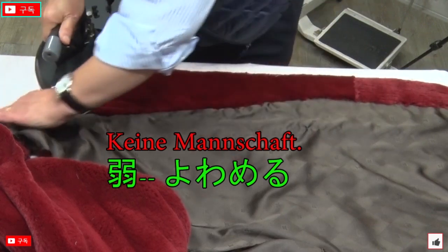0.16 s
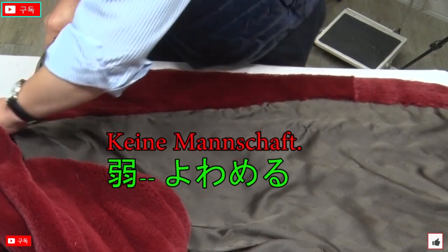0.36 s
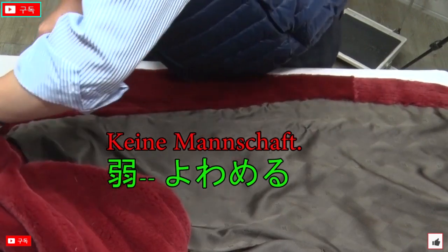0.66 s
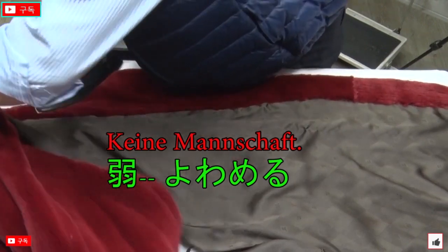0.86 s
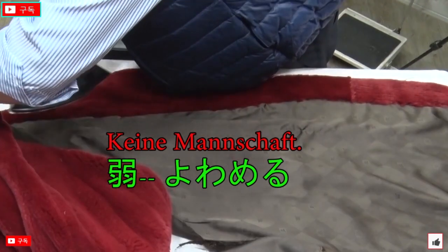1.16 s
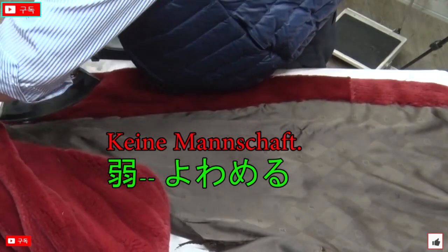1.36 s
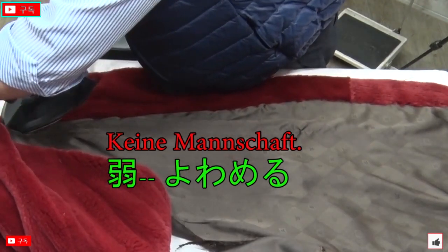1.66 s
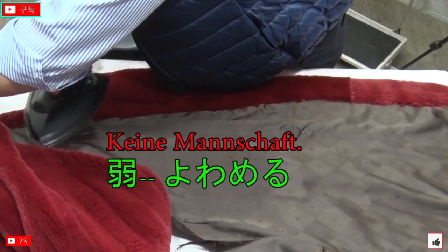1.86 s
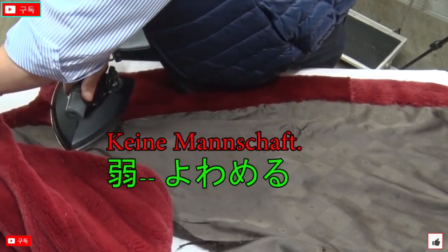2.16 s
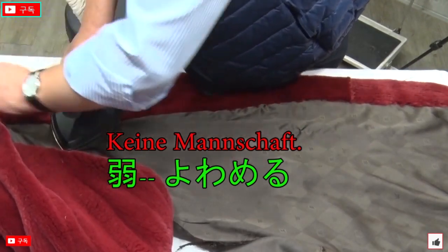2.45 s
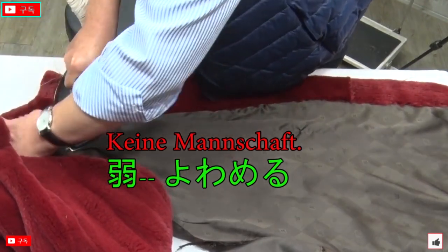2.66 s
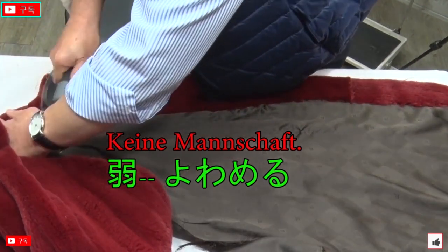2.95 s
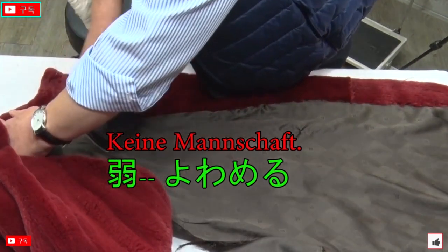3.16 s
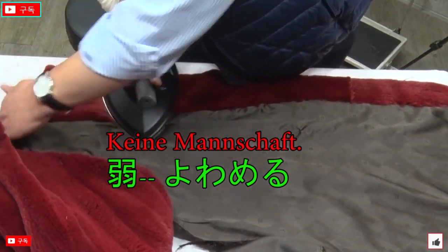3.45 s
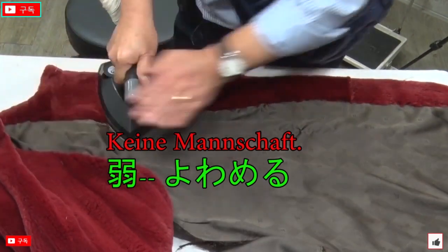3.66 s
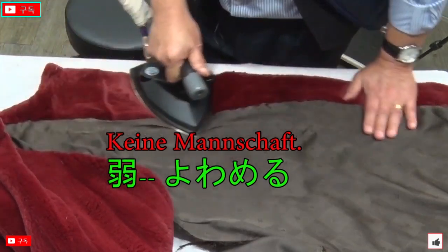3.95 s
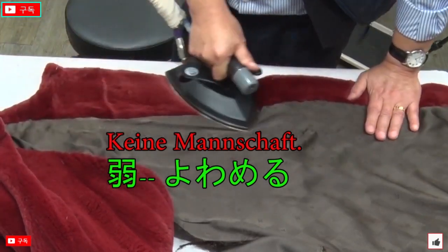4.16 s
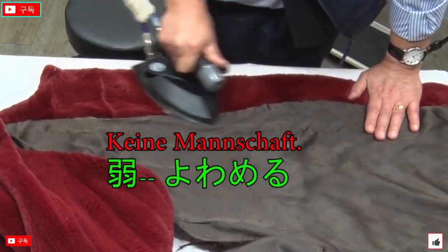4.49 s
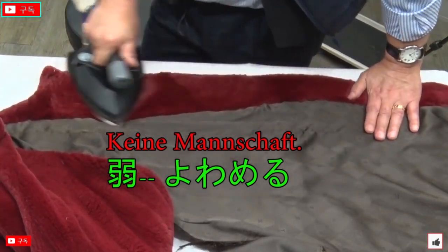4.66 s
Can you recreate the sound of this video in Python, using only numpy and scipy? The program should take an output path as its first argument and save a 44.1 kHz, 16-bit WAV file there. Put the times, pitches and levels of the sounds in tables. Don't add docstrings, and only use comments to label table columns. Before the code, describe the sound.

A steady low motor hum throbs slowly under duct air roar while a steam iron hisses and brushes over cloth, close indoors.

```python
import sys
import numpy as np
from scipy import signal
from scipy.fft import rfft, irfft
from scipy.io import wavfile
from scipy.ndimage import uniform_filter1d

SR = 44100
rng = np.random.default_rng(int(sys.argv[2]) if len(sys.argv) > 2 else 0)


def level_to_linear(level):
    exponent = np.asarray(level, float) / 20
    return 10 ** exponent


def pcm_store(signal):
    levels = np.round(np.clip(np.atleast_2d(signal), -1, 1) * 32767)
    wavfile.write(sys.argv[1], SR, levels.astype(np.int16).T)


N = 212606
TIME = np.arange(N) / SR
HZ = np.maximum(np.fft.rfftfreq(N, 1 / SR), 1)

# right_peak_db, left_minus_right_db, left_lead_rad
MAINS_TONES = [(-20.5, -13, .4), (-42, -18, -2.4), (-39, -15, 2.6)]
SHAFT_TONES = [(-40, -16, 0.), (-23.1, -12.3, .3), (-43, -12, 1.5), (-45, -5, 1.2)]
BELT_TONES = [(-40.5, -10, 2.9), (-33.5, -20, 1.), (-35, -14.5, -.1), (-41, -14, .7)]
# time_s, level_db
LEFT_TURN = [(0, 1.5), (1.6, 0.1), (2.4, -1), (3.8, -0.3), (4.82, -1.5)]
# frequency_hz, density_db_per_hz
ROAR_RIGHT = [(22, -73), (45, -69), (60, -64.5), (90, -45.5), (150, -48.5), (200, -46.5), (300, -51.5),
              (520, -57.5), (760, -60.5), (900, -64), (1400, -71.5), (3000, -77), (6000, -84),
              (11000, -90.5)]
ROAR_LEFT = [(22, -83), (50, -60), (90, -59), (160, -64.5), (240, -64), (320, -62), (480, -68.5),
             (600, -74), (850, -81.5), (1300, -88), (3000, -95.5), (5000, -99.5), (11000, -102.4)]
# frequency_hz, width_hz, level_db
DUCT_RESONANCES = [(67, 11, -13), (105, 14, -2), (140, 16, 2), (188, 25, 3), (255, 25, -3), (360, 25, 3),
                   (395, 30, -3), (475, 40, 3), (670, 60, 4), (830, 70, -2), (1170, 260, 4), (1500, 50, -3),
                   (1600, 80, 3), (1880, 120, 2), (3800, 300, -3), (4600, 1400, 2), (5700, 400, -3),
                   (6900, 900, 2)]
# frequency_hz, likeness_0_to_1, left_lead_rad
LIKENESS = [(45, .2, 0.), (80, .75, .3), (140, .88, .3), (200, .8, .5), (240, .4, 1.5), (290, .83, 1.9),
            (450, .7, 1.5), (590, .65, 1.9), (640, .1, 0.), (740, .62, -2.1), (880, .2, -2.2),
            (1050, .3, 1.), (1300, .05, 0.)]
# frequency_hz, density_db_per_hz
HISS_RIGHT = [(700, -45), (1500, 0), (3000, 3), (5000, 1), (8000, -6), (11500, -6)]
HISS_LEFT = [(500, -18), (1200, -12), (2500, 1), (4000, -1.5), (7000, -8.5), (11500, -4)]
# peak_s, length_s, right_db, left_db, treble_db (light brush +, heavy drag -)
STROKES = [(.0, 0.027, -32, -52, 0), (0.112, 0.086, -39.5, -51, 0.5), (0.188, 0.086, -37.5, -54, 0),
           (0.458, 0.074, -42, -57, -4), (.69, 0.085, -47, -54, 1.), (1.0, 0.19, -48.5, -56, -1),
           (1.33, 0.11, -45, -61, 1), (1.752, 0.24, -47.5, -63, 0), (2.42, .12, -46, -61, -2.),
           (2.73, .1, -55, -52, -1.), (3.1, 0.26, -48, -68, 2), (3.622, 0.21, -41.5, -53, 0.),
           (3.749, 0.15, -37.5, -52, 3.5), (3.869, 0.11, -35.5, -52, -0.5), (3.95, 0.2, -39.5, -66, -0.5),
           (4.35, 0.076, -41.5, -62, -7), (4.5, .12, -42, -55, -4), (4.722, 0.24, -46.5, -58, 2)]
# start_s, right_peak_db, left_peak_db
SNAPS = [
    (.229, -50, -45),
    (.514, -50, -46),
    (2.272, -33, -55),
    (2.7755, -50, -35),
    (3.570, -50, -45),
    (4.270, -34, -50),
]
# frequency_hz, left_rms_per_step, right_rms_per_step, drop_share (of the power around)
CAMERA_THRIFT = [(200, 12, 30, 0.), (500, 9, 14, 0.), (1000, 2.8, 10, .1), (1700, 1.35, 6, .33),
                 (2400, 1.2, 4.8, .45), (3400, 1.1, 4.4, .53), (4800, .87, 3.9, .62), (6200, .8, 2.8, .68),
                 (11500, .78, 2.3, .69)]


def contour(points, column=1):
    points = np.array(points, float)
    return np.interp(np.log(HZ), np.log(points[:, 0]), points[:, column])


def white():
    return rfft(rng.standard_normal(N)) * np.sqrt(SR / 2)


def walk(rate_hz):
    hold = int(SR / rate_hz)
    levels = np.repeat(rng.standard_normal(N // 500), hold)[:N]
    slewed = uniform_filter1d(levels, hold)
    return 1.3 * uniform_filter1d(slewed, hold)


def swell(peak_s, length_s):
    rise_share = 0.91
    late = (TIME - peak_s) / length_s * 2
    return np.exp(-np.where(late < 0, late / rise_share, late) ** 2)


def motor(sway_db=.5):
    mains_hz, shaft_hz, belt_hz = 60.0, 58.89, 26.5
    throb_peak_s = 2.291
    tones_hz = np.concatenate([mains_hz * np.array([2, 6, 8]),
                               shaft_hz * np.array([1, 2, 4, 8]),
                               belt_hz * np.array([2, 3, 5.05, 7.01])])
    out = np.zeros((2, N))
    for hz, (right_db, left_db, lead) in zip(tones_hz, MAINS_TONES + SHAFT_TONES + BELT_TONES):
        phase = 2 * np.pi * hz * (TIME - throb_peak_s)
        level = level_to_linear(right_db + sway_db * walk(1.86))
        out += level * np.array([level_to_linear(left_db) * np.cos(phase + lead), np.cos(phase)])
    return out


def roar(swell_db=0.6, flicker_db=.5):
    resonances = sum(db / (1 + (2 * (HZ - hz) / width) ** 2) for hz, width, db in DUCT_RESONANCES)
    like = np.clip(contour(LIKENESS), 0, .99)
    lead = np.exp(1j * contour(LIKENESS, column=2))
    right = white()
    left = like * lead * right + np.sqrt(1 - like ** 2) * white()
    pair = np.array([left * level_to_linear(contour(ROAR_LEFT)), right * level_to_linear(contour(ROAR_RIGHT) + resonances)])
    out = np.zeros((2, N))
    surge = walk(0.72)
    for octave in range(-1, 10):
        share = np.clip(1 - abs(np.log2(HZ / 40) - octave), 0, 1)
        out += irfft(pair * share, N) * level_to_linear(swell_db * surge + flicker_db * walk(9))
    return out


def hiss(grain_db=2.5, flutter_db=1.67):
    steam_db, seep_db = [-43, -51.5], [-53.5, -66.5]
    steam_fade_db_s = 6.5
    treble = 1 / (1 + (6000 / HZ) ** 4)
    out = []
    for colour, side in ((HISS_LEFT, 1), (HISS_RIGHT, 0)):
        grains = rng.standard_normal(N) * level_to_linear(grain_db * rng.exponential(size=N))
        air = rfft(grains) * level_to_linear(contour(colour))
        air = air / irfft(air, N).std()
        steam = level_to_linear(seep_db[side]) ** 2 + level_to_linear(steam_db[side] - steam_fade_db_s * TIME) ** 2
        body_power, treble_power = steam.copy(), steam.copy()
        for peak_s, length_s, *db in STROKES:
            stroke = swell(peak_s, length_s)
            body_power += (level_to_linear(db[side]) * stroke) ** 2
            treble_power += (level_to_linear(db[side] + db[2]) * stroke) ** 2
        body = irfft(air * (1 - treble), N) * np.sqrt(body_power)
        top = irfft(air * treble, N) * np.sqrt(treble_power)
        out.append((body + top) * level_to_linear(flutter_db * walk(15)))
    return np.array(out)


def snaps(decay_s=.0009):
    out = np.zeros((2, N))
    cracks = rng.standard_normal((len(SNAPS), 300)) * np.exp(-np.arange(300) / SR / decay_s)
    cracks = signal.lfilter(*signal.butter(1, [1800, 7000], "bandpass", fs=SR), cracks) * 1.8
    for (start_s, right_db, left_db), crack in zip(SNAPS, cracks):
        i = int(start_s * SR)
        out[:, i:i + len(crack)] += level_to_linear([[left_db], [right_db]]) * crack
    return out


def whine(level_db=-44.5, left_db=-20):
    centre_hz, width_hz = 1055, 41
    air = irfft(white() / (1 + (2 * (HZ - centre_hz) / width_hz) ** 2), N)
    return air / air.std() * swell(2.95, 1) * level_to_linear(level_db) * level_to_linear([[left_db], [0]])


def scene():
    table = motor() + roar()
    table[0] *= level_to_linear(np.interp(TIME, *np.transpose(LEFT_TURN)))
    return table + hiss() + snaps() + whine()


def camera_economy(x):
    frame, grid, lines_kept, band_lines = 1024, 258, 560, 16
    edge_hz, edge_spread_hz = 11740, 120
    frame_budget_db, band_budget_db = 1.3, 3.0

    bell = np.kaiser(frame + 1, 4 * np.pi)
    rise = np.sqrt(np.cumsum(bell[:-1]) / bell.sum())
    window = np.r_[rise, rise[::-1]]
    line = np.arange(lines_kept) + .5
    basis = np.cos(np.pi / frame * np.outer(line, np.arange(2 * frame) + .5 + frame / 2)) * window
    padded = np.pad(x, ((0, 0), (2 * frame - grid, 3 * frame)), "reflect")
    at = np.arange(N // frame + 3)[:, None] * frame + np.arange(2 * frame)
    lines = padded[:, at] @ basis.T
    power = lines ** 2

    hz = line * SR / (2 * frame)
    table_hz, *columns = np.transpose(CAMERA_THRIFT)
    left, right, share = (np.interp(hz, table_hz, column) for column in columns)
    band = np.repeat(power.reshape(2, len(at), -1, band_lines).mean(-1), band_lines, axis=-1)
    band = uniform_filter1d(band, size=3, axis=1)

    edge = edge_hz + edge_spread_hz * rng.standard_normal((2, len(at), 1))
    frame_db = frame_budget_db * rng.standard_normal((2, len(at), 1))
    band_db = band_budget_db * rng.standard_normal((2, len(at), lines_kept // band_lines))
    tight = level_to_linear(frame_db + np.repeat(band_db, band_lines, axis=-1))

    near = uniform_filter1d(uniform_filter1d(power, size=4, axis=2), size=3, axis=1)
    around = uniform_filter1d(uniform_filter1d(power, size=41, axis=2), size=3, axis=1)
    excess = near / (share * np.sqrt(tight) * around + 1e-18) - 1
    lines = lines * np.clip(excess / .72, 0, 1) * (hz < edge)

    fineness = np.repeat(np.array([left, right])[:, None, ::band_lines], band_lines, axis=-1)
    step = np.sqrt(band + 1e-18) / fineness * tight
    rounded = np.floor((abs(lines) / step) ** .75 + .4054) ** (4 / 3) * step * np.sign(lines)

    frames = rounded @ basis * 2 / frame
    out = np.zeros_like(padded)
    out[:, at[:, :frame]] += frames[..., :frame]
    out[:, at[:, frame:]] += frames[..., frame:]
    return out[:, 2 * frame - grid:][:, :N]


def roll_off(x):
    return signal.sosfilt(signal.butter(12, 11930, fs=SR, output="sos"), x)


def record(dry):
    mix = camera_economy(dry)
    return roll_off(mix)


dry = scene()
out = record(dry)
pcm_store(out)
```